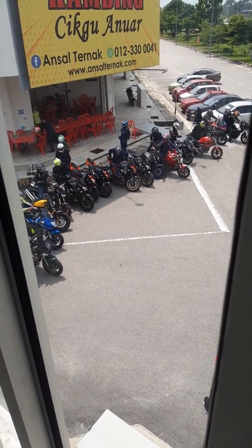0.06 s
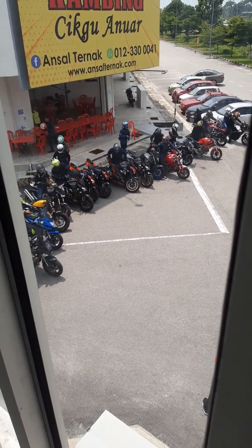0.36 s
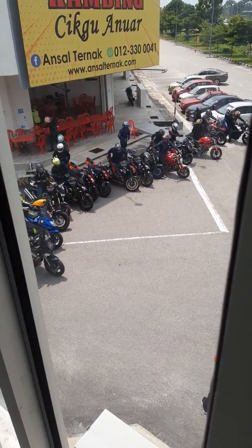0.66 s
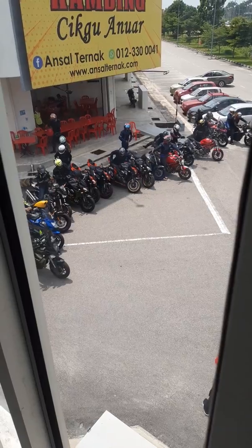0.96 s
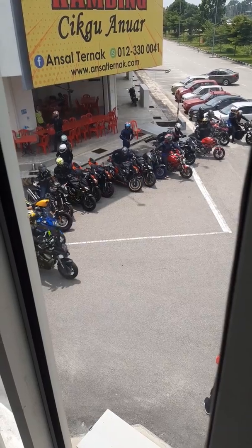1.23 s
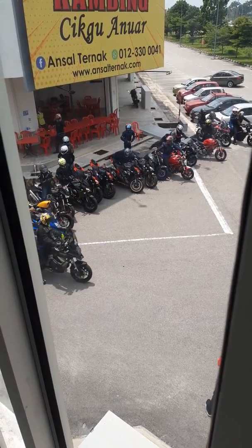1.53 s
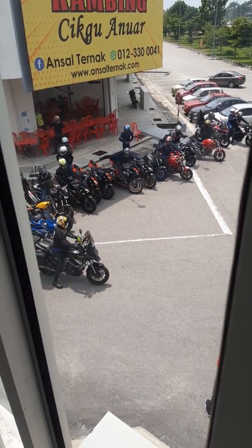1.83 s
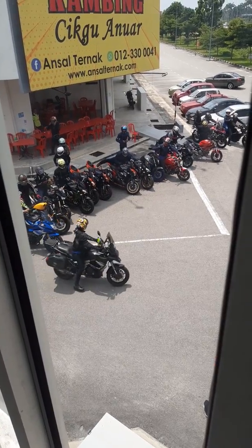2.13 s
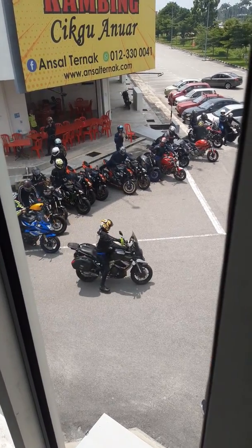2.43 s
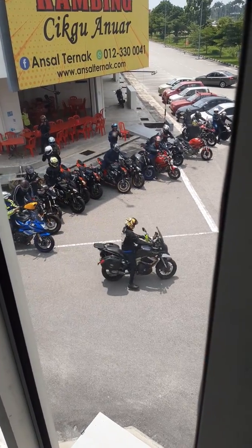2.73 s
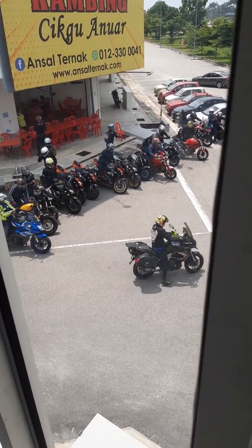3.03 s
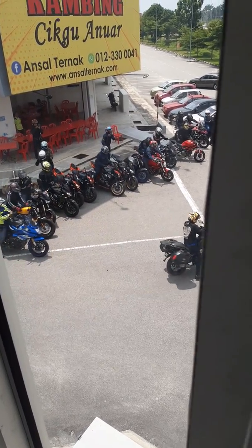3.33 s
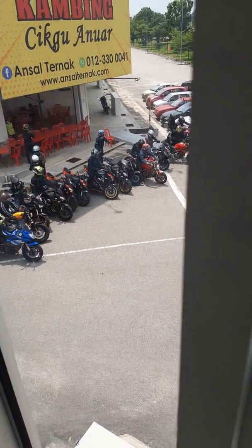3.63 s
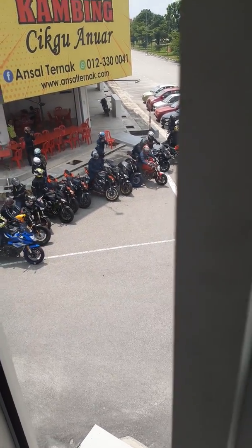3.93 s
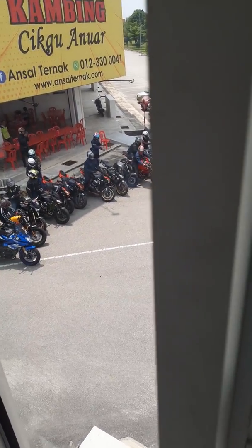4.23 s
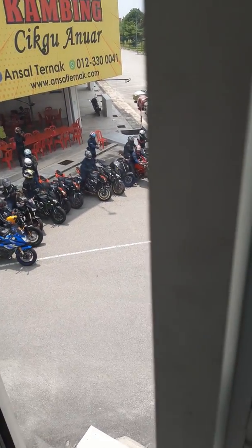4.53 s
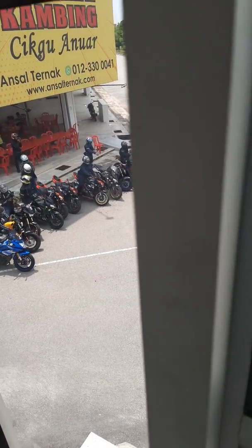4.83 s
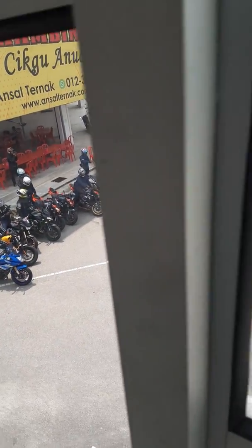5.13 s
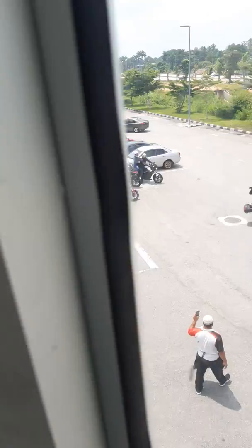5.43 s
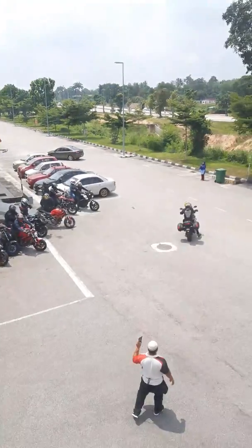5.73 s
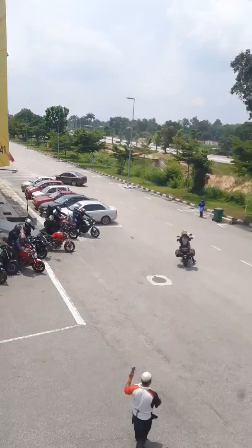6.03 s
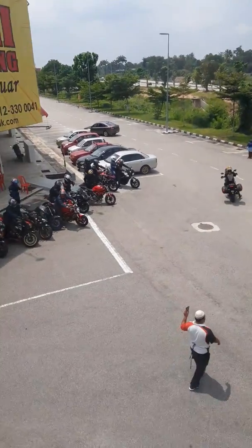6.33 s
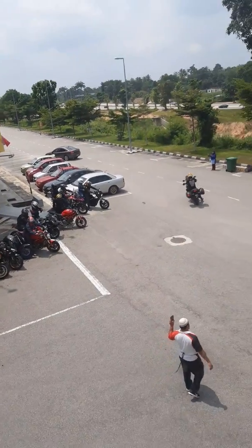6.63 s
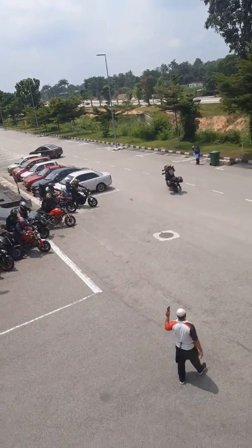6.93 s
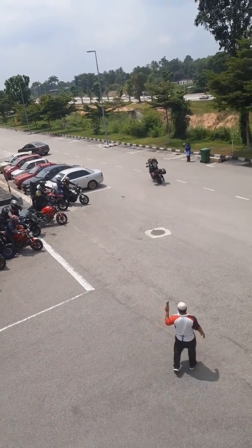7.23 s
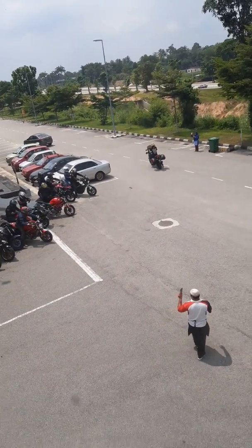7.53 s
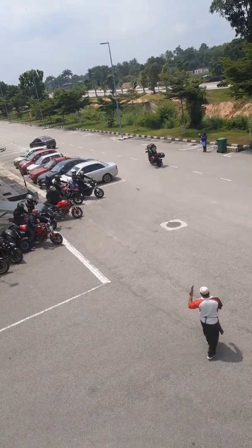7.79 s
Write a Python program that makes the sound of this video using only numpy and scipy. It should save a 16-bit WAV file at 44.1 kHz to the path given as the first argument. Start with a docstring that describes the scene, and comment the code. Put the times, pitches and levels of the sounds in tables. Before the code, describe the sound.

A group of motorbikes throbs and clatters at idle as one accelerates past in short revs, with faint handling noise near the microphone.

```python
"""Twin-cylinder motorcycles idle in a car park, heard through an upstairs window; one rides off.
Uneven firings ring the silencers and beat against each other; valve gear clatters, gears whine
faintly, shop fronts echo. The leaving bike revs, turns its tail to the window and booms past below.
Near the microphone a hand knocks, rubs and clicks; faint squeaks come near the end."""
import sys
import numpy as np
from scipy import signal
from scipy.fft import rfft, irfft, next_fast_len
from scipy.io import wavfile

SR = 44100
rng = np.random.default_rng(int(sys.argv[2]) if len(sys.argv) > 2 else 0)


def generate_wav(sig):
    """Save sig (samples, or channels by samples) to the path in sys.argv[1] as 16-bit PCM at SR."""
    pcm = np.round(np.clip(np.atleast_2d(sig).T, -1, 1) * 32767).astype(np.int16)
    wavfile.write(sys.argv[1], SR, pcm)


N = 346626
TIME = np.arange(N) / SR

# idling twins: cycle_hz, second_firing_cycles, silencer_hz, relative_db
IDLING_TWINS = [(12.43, .375, 94, 2.5), (10.23, .25, 200, -3), (8.7, .44, 210, -5), (11.02, .5, 180, 0),
                (12.0, .45, 195, 3), (9.3, .5, 160, 3)]
# stereo width of the echoes: freq_hz, side_gain_db
SIDE_SPECTRUM = [(30, -20.5), (90, -22), (140, -10.5), (210, -18), (320, -7), (490, -2), (740, -3.5),
                 (1130, 1), (1700, 1), (2600, 0.5), (15000, 1)]


def undb(db):
    """Decibels to gain."""
    return 10 ** (np.asarray(db) / 20)


def unit(x):
    """Scale to rms 1."""
    return x / np.sqrt(np.mean(x ** 2))


def curve(points):
    """Join (time_s, value) points by straight lines."""
    return np.interp(TIME, *np.transpose(points))


def swell(peak_s, rise_s, fall_s):
    """Gaussian rise to 1 and fall."""
    span_s = np.where(TIME < peak_s, rise_s, fall_s)
    return np.exp(-np.minimum(np.abs(TIME - peak_s) / span_s, 10) ** 2)


def held(open_s, attack_s, hold_s, release_s):
    """Gaussian rise to 1, hold and fall."""
    rising = np.minimum(TIME - open_s, 0) / attack_s
    falling = np.maximum(TIME - open_s - hold_s, 0) / release_s
    return np.exp(-rising ** 2 - falling ** 2)


def walk(rate_hz):
    """Random wander, spread near 1."""
    knots = rng.standard_normal(int(N / SR * rate_hz) + 2)
    return np.interp(TIME * rate_hz, np.arange(len(knots)), knots)


def waver(hz, rate_hz):
    """Tone of wandering strength and phase, unrelated in mid and side."""
    phase = 2 * np.pi * np.cumsum(hz) / SR
    return np.array([walk(rate_hz) * np.sin(phase) + walk(rate_hz) * np.cos(phase) for _ in range(2)])


def fade(x, decay_s):
    """Give each pulse an exponential tail."""
    return signal.lfilter([1], [1, -np.exp(-1 / (decay_s * SR))], x)


def colour(x, points):
    """Filter by (freq_hz, gain_db) points."""
    size = next_fast_len(N + SR // 4)
    hz, db = np.transpose(points)
    bins_hz = np.maximum(np.fft.rfftfreq(size, 1 / SR), 1)
    gain = undb(np.interp(np.log(bins_hz), np.log(hz), db))
    return irfft(rfft(x, size) * gain, size)[..., :N]


def band(x, low_hz, high_hz):
    """Steep zero-phase band-pass."""
    size = next_fast_len(N + SR // 4)
    bins_hz = np.maximum(np.fft.rfftfreq(size, 1 / SR), 1)
    gain = 1 / ((1 + (low_hz / bins_hz) ** 10) * (1 + (bins_hz / high_hz) ** 10))
    return irfft(rfft(x, size) * gain, size)[..., :N]


def ring(x, hz, width_hz):
    """Resonance, gain 1 at centre."""
    return signal.lfilter(*signal.iirpeak(hz, hz / width_hz, fs=SR), x)


def steep_ring(x, hz, width_hz):
    """Two like resonances in series."""
    return ring(ring(x, hz, width_hz), hz, width_hz)


def gliding_ring(x, hz, width_hz):
    """Resonance with a moving centre."""
    spin = np.exp(2j * np.pi * np.cumsum(hz) / SR)
    decay_s = 1 / (np.pi * width_hz)
    return 2 * np.real(fade(x / spin, decay_s) * spin) / (decay_s * SR)


def yard(x, wet_db, t60_s=0.74):
    """Direct sound plus echoes off shop fronts and window recess, as mid and side."""
    taps = SR // 2
    tails = rng.standard_normal((2, taps)) * undb(-60 * TIME[:taps] / t60_s)
    tails *= undb(wet_db) / np.sqrt(np.sum(tails ** 2, axis=1, keepdims=True))
    tails[0, 0] += 1  # direct path
    running = np.concatenate([x[taps:0:-1], x])  # engines already running at 0 s
    mid, side = (signal.fftconvolve(running, tail)[taps:taps + N] for tail in tails)
    return np.array([unit(mid), colour(unit(side), SIDE_SPECTRUM)])


def moving_yard(x, wet_db, places=3):
    """A moving source crossfades between sets of echo paths."""
    place = TIME / TIME[-1] * (places - 1)
    return sum(np.sqrt(np.maximum(1 - np.abs(place - k), 0)) * yard(x, wet_db) for k in range(places))


def firings(cycle_hz, second_firing_cycles, hunt_share, scatter_db, second_db=-1.5):
    """Two unevenly spaced firings per four-stroke cycle; speed hunts, no two burns alike."""
    cycles = rng.random() + np.cumsum(cycle_hz * (1 + hunt_share * walk(14))) / SR
    pulses = np.zeros(N)
    for lag, db in ((0, 0), (second_firing_cycles, second_db)):
        count = np.floor(cycles - lag)
        pulses += undb(db) * np.diff(count, prepend=count[0])
    return pulses * undb(scatter_db * walk(200))


def ride(rev_hz=3, turn_s=5.3, turn_span_s=0.33):
    """Leaving bike: cycle rate, throttle (0-1), turn away from the window (0-1)."""
    # engine speed before revs: time_s, cycle_hz
    base_speed = [(0, 10.4), (1.3, 12.27), (1.8, 15.4), (4.5, 11.74), (5.5, 20.1), (7.2, 26.2),
                  (7.86, 29.2)]
    # throttle twists: open_s, attack_s, hold_s, release_s, opening_share
    twists = [(1.599, .4, .35, .3, 0.25), (2.951, .55, .35, .35, .36), (4.859, 0.069, .2, 0.0998, 0.99),
              (6.617, .07, 0.1486, 0.199, .45), (7.048, .1, 0.2, 0.14, 0.36), (7.718, .1, .15, .3, 0.45)]
    throttle = sum(opening * held(*timing) for *timing, opening in twists)
    turned = .5 + .5 * np.tanh((TIME - turn_s) / turn_span_s)
    return curve(base_speed) + rev_hz * throttle, throttle, turned


def idle_pipes(idle_pulses):
    """Each idler's firings ring its silencer."""
    pipes = sum(undb(db) * (1.08 * pulses + ring(pulses, hz, width_hz=60))
                for pulses, (_, _, hz, db) in zip(idle_pulses, IDLING_TWINS))
    return yard(unit(pipes), wet_db=-7.5)


def rider_pipe(pulses, cycle_hz, throttle, turned, reference_hz=28.7):
    """The leaving bike's silencer rings; hotter gas at speed raises its modes."""
    # silencer modes at the reference cycle rate: pitch_hz, width_hz, gain_db
    modes = [(175, 55, 1), (244, 46, -3), (308, 130, -4), (377, 56, -10.5)]
    heat = (cycle_hz / reference_hz) ** 0.21
    ringing = sum(undb(db) * gliding_ring(pulses, hz * heat, width_hz) for hz, width_hz, db in modes)
    relative_db = -16 + 5.5 * throttle + 0.5 * turned
    return undb(relative_db) * moving_yard(unit(0.18 * pulses + ringing), wet_db=3.5)


def hums(weaker_share=0.42, drift_share=0.01205, flutter_db=3.5):
    """Engine orders beat as pairs of like engines drift in and out of step."""
    # engine orders: pitch_hz, start_db, slope_db_per_s, in_step_s, beat_period_s
    orders = [(61.8, -43.5, 1.06, 3.6, 1.4), (72.74, -34.5, 0, 2.72, 3.4), (86.94, -39, 0.66, 2.48, 2.3),
              (93.8, -30.5, -0.85, 1.74, 0.95), (127.03, -31.5, -0.11, 3.09, 1.84),
              (151.9, -30.5, -3.5, 0.59, 2), (187.9, -37, 0, 3.1, 1.25), (206.3, -30, -1.5, 2.427, 1.1)]
    out = np.zeros(N)
    for hz, start_db, db_per_s, in_step_s, period_s in orders:
        cycles = rng.random() + np.cumsum(hz * (1 + drift_share * walk(6))) / SR
        slip = (TIME - in_step_s) / period_s
        pair = np.sin(2 * np.pi * cycles) + weaker_share * np.sin(2 * np.pi * (cycles + slip))
        out += undb(start_db + db_per_s * TIME + flutter_db * walk(11)) * np.sqrt(2) * pair
    return out


def exhausts(pipes, throttle, turned):
    """All pipes and hums rumble; the upper band barks on throttle and as the pipe faces the window."""
    # exhaust spectrum: freq_hz, gain_db
    spectrum = [(22, -41), (32, -34.5), (38, -7.5), (50, -15.5), (60, -6), (90, 3), (112, -5.5),
                (130, -1.5), (160, -.5), (195, -1), (250, -2.5), (310, -10), (365, -15), (420, -29.5),
                (800, -53), (1100, -68)]
    # brief dips of the rumble: centre_s, half_length_s, depth_db
    lulls = [(1.51, .07, -4), (3.8, 0.088, -2), (4.667, 0.093, -1), (5.903, 0.13, -2)]
    pipes = colour(pipes, spectrum)
    pipes *= undb(-23.2) / pipes[0].std()
    pipes[0] += hums()
    bass = band(pipes, 18, 80) * undb(1 - 2 * turned)
    rumble = band(pipes, 80, 265)
    bark = band(pipes, 265, 1500) * undb(-2 + 4 * throttle + 5.5 * turned)
    lull_db = sum(db * swell(centre_s, half_s, half_s) for centre_s, half_s, db in lulls)
    return (bass + rumble) * undb(lull_db) + bark


def firing_tone(pitch_hz=111.9, drift_share=.01):
    """The group's strongest engine order swells and fades."""
    # tone envelope: time_s, relative_db
    envelope = [(0.0, -39), (0.25, -30), (0.6, -35), (0.8, -29), (1.25, -32.5), (1.95, -24.0), (2.5, -40),
                (3.0, -22.5), (3.5, -32.0), (3.7, -25.5), (3.9, -30), (4.05, -41.5), (4.25, -23.5),
                (4.8, -29), (5.2, -23.5), (5.4, -33.5), (5.6, -26.5), (5.95, -33), (6.15, -23.5),
                (6.5, -23.5), (6.9, -36.5), (7.3, -20), (7.6, -30.5), (7.85, -21.5)]
    cycles = rng.random() + np.cumsum(pitch_hz * (1 + drift_share * walk(8))) / SR
    return undb(curve(envelope) + 0.5) * np.sqrt(2) * np.sin(2 * np.pi * cycles)


def clatter(pulses, throttle, turned, settle_s=0.73, hollow_db=-2.5):
    """Each firing sets off a burst of valve and gas noise; the yard smears the gas into a wash."""
    # valve gear and gas spectrum: freq_hz, gain_db
    spectrum = [(250, -2), (400, 5), (510, -0.5), (640, -0.5), (850, -5), (1150, -8.5), (1550, -8.5),
                (2000, -16.5), (2500, -18.5), (3500, -30), (4700, -31.5), (7000, -40), (11000, -37.5),
                (15500, -46.5)]
    power = 0.39 * unit(fade(pulses, 0.0051)) + 2.3 * unit(fade(pulses, 0.061)) + 0.74
    valves, gas = np.sqrt(power) * rng.standard_normal((2, 2, N))
    valves[1] = colour(valves[1], SIDE_SPECTRUM)
    wash = colour(unit(valves) + 0.87 * yard(gas[0], wet_db=8.0), spectrum)
    wash += (undb(hollow_db * turned) - 1) * ring(wash, hz=1000, width_hz=410)  # mids thin after the turn
    level_db = -50.5 + 4.5 * np.exp(-TIME / settle_s) + 0.7 * throttle
    return wash * undb(level_db) / band(wash[0], 567, 2000).std()


def growl(pulses, throttle, turned, leave_s=1.1, speed_m_s=5.6, waiting_m=9):
    """The leaving bike's firings and air gulps ring its cases, valve cover, air box and pipe outlet."""
    # resonances of cases, cover, air box, outlet: pitch_hz, width_hz
    modes = [(810, 210), (1610, 620), (480, 100), (650, 290)]
    gulps = np.sqrt(unit(fade(pulses, 0.014)) + .5) * rng.standard_normal((2, N))
    drive = unit(gulps) + 0.74 * yard(pulses, wet_db=6.0)
    distance_m = np.hypot(waiting_m, speed_m_s * np.maximum(TIME - leave_s, 0))
    away_db = -20 * np.log10(distance_m / waiting_m) - 14.5 * turned  # its body hides the engine
    cases_db = -53.5 - 3.5 * throttle + away_db
    cover_db = -64 + 17.5 * throttle + away_db
    air_box_db = -55.5 + 22 * throttle + away_db
    outlet_db = -64 + 9 * throttle
    out = sum(undb(db) * unit(steep_ring(drive, *mode))
              for db, mode in zip((cases_db, cover_db, air_box_db, outlet_db), modes))
    return out * np.array([[1], [.75]])


def whines(drift_share=.006, flutter_hz=22):
    """Gears and chains sing thin, drifting tones that flutter in the echoes."""
    # gear and chain tones: pitch_hz, level_db, peak_s, half_length_s
    tones = [(477.5, -51.5, 2.5, 1.8), (527, -50, 2.5, 2), (601, -57.5, 1.8, 2), (838, -58.5, .7, 2.6),
             (922, -60, .8, 0.82), (1003, -59.5, 0.47, 0.8), (1630, -61.5, 0.9, 0.99),
             (2230, -70, 1.1, 3.5)]
    out = np.zeros((2, N))
    for hz, db, peak_s, half_s in tones:
        pitch_hz = hz * (1 + drift_share * walk(5))
        out += undb(db) * swell(peak_s, half_s, half_s) * waver(pitch_hz, flutter_hz)
    return out * np.array([[1], [.75]])


def knocks(tail_db=-23, tail_s=0.091):
    """A finger knocks on the microphone case: a noise burst with a short tail rings its modes."""
    # finger knocks: start_s, drive_db, attack_s, contact_s
    contacts = [(0.08, -34, 0.01, 0.013), (0.1305, -31, 0.00088, 0.0054), (.149, -40, .001, .004)]
    # case modes: pitch_hz, width_hz, gain_db
    modes = [(1114, 600, 8.5), (1750, 510, 4.5), (2290, 400, 9.5), (2900, 990, 2.5), (5500, 3600, -10),
             (10800, 2900, -12)]
    push = np.zeros(N)
    for start_s, db, attack_s, contact_s in contacts:
        age_s = np.maximum(TIME - start_s, 0)
        decay = np.exp(-age_s / contact_s) + undb(tail_db) * np.exp(-age_s / tail_s)
        push += undb(db) * (1 - np.exp(-age_s / attack_s)) * decay
    burst = push * rng.standard_normal((2, N))
    return sum(undb(db) * steep_ring(burst, hz, width_hz) for hz, width_hz, db in modes)


def hisses():
    """Thin hisses as the hand shifts."""
    # hiss spectrum: freq_hz, gain_db
    spectrum = [(1000, -16.5), (2500, 5), (3300, -7), (7000, -8.5), (9700, -3), (10600, 4), (12300, 0),
                (13000, 0), (14300, 0), (15500, -7)]
    # hiss swells: peak_s, rise_s, fall_s, level_db, cutoff_hz
    shifts = [(.095, .014, .045, -69, 13500), (3.9, .08, 0.13, -77, 13000), (4.87, .07, 0.098, -67, 14000),
              (5.79, 0.14, .1, -66.5, 17000), (6.63, .03, .07, -74, 14000), (7.08, .12, .15, -77, 14500),
              (7.67, 0.053, 0.062, -64.5, 14270), (7.83, .11, .15, -57, 15000)]
    hiss = unit(colour(rng.standard_normal((2, N)), spectrum))
    out = np.zeros((2, N))
    for *timing, db, cutoff_hz in shifts:
        lowpass = signal.butter(10, cutoff_hz, fs=SR, output="sos")
        out += undb(db) * swell(*timing) * signal.sosfilt(lowpass, hiss)
    return out


def rubs(catch_db=1.5, catch_hz=450):
    """Skin slides in tiny catches, along with duller cloth."""
    # hand strokes: peak_s, rise_s, fall_s, skin_db, cloth_over_skin_db
    strokes = [(.148, 0.051, 0.035, -70, 22), (0.23, 0.049, 0.16, -71, 18.5),
               (1.939, 0.018, 0.019, -68, 14), (3.88, 0.12, 0.76, -71.5, 7.5),
               (4.47, 0.063, 0.32, -75.5, 12), (4.89, 0.093, 0.3, -66.5, 11), (5.45, 0.38, 0.3, -71, 10.5),
               (5.811, 0.14, 0.11, -71, -14), (6.401, 0.94, 0.92, -68.5, -6), (6.63, 0.036, 0.12, -76, 10),
               (7.27, 0.28, 0.45, -73.5, 15.5), (7.819, 0.17, 0.13, -63.5, 7.5)]
    # skin friction: freq_hz, gain_db
    skin_spectrum = [(1500, -13.5), (3500, 0.5), (4900, 7), (7000, -2.5), (9000, 0), (11500, -6.5),
                     (13500, -11.5), (16000, -16)]
    # cloth friction: freq_hz, gain_db
    cloth_spectrum = [(300, -15.5), (600, 0), (1200, 2), (2200, 1), (3500, -9.5), (5000, -18.5),
                      (7000, -25), (12000, -46)]
    grain = rng.standard_normal((2, N)) * undb(catch_db * walk(catch_hz))
    skin = unit(colour(grain, skin_spectrum))
    cloth = unit(colour(rng.standard_normal((2, N)), cloth_spectrum))
    return sum(undb(db) * swell(*timing) * (skin + undb(cloth_db) * cloth)
               for *timing, db, cloth_db in strokes)


def thumps():
    """Dull low thumps in the engines' rumble, where firings happen to coincide."""
    # low thumps: start_s, peak_db
    events = [(.283, -9), (1.626, -14.5), (1.871, -13), (1.975, -11.5), (2.167, -13.5), (2.328, -14),
              (2.487, -15), (2.859, -12.5), (3.016, -19), (3.28, -11.5), (4.313, -17.5), (4.873, -10),
              (5.237, -13.5), (6.444, -22.5), (6.623, -13), (6.953, -12), (7.112, -15.5), (7.255, -15.5),
              (7.449, -8.5), (7.696, -10.5)]
    pulses = np.zeros(N)
    for start_s, db in events:
        pulses[int(start_s * SR)] = undb(db)
    thuds = band(ring(pulses, hz=145, width_hz=190), 65, 290)
    return thuds * pulses.max() / np.abs(thuds).max()


def passing_boom(pulses, level_db=-31.5):
    """The leaving bike's firings build a deep boom as it rolls past below."""
    boom = unit(steep_ring(pulses, hz=60.5, width_hz=16))
    return undb(level_db) * swell(peak_s=5.25, rise_s=3.2, fall_s=0.34) * boom


def clicks():
    """Handling clicks: a snap of noise rings one high resonance."""
    # clicks: start_s, peak_db, pitch_hz, width_hz, decay_s
    snaps = [(4.417, -40, 5730, 550, 0.0017), (6.025, -56, 8800, 2020, .014)]
    out = np.zeros((2, N))
    for start_s, db, hz, width_hz, decay_s in snaps:
        envelope = (TIME >= start_s) * np.exp(-np.abs(TIME - start_s) / decay_s)
        snap = rng.standard_normal((2, N)) * envelope
        click = ring(snap + 1e-18, hz, width_hz) + 0.06 * snap
        out += undb(db) * click / np.abs(click).max()
    return out


def squeaks(rasp_db=2, rasp_hz=160):
    """Faint squeaks catch and slip; pitch arches with strength."""
    # squeaks: peak_s, half_length_s, top_hz, arch_hz, width_hz, level_db
    slips = [(6.968, .032, 13700, 1700, 300, -75), (7, 0.039, 11300, 1200, 700, -76),
             (7.09, 0.077, 11000, 600, 260, -75), (7.09, .06, 14000, 900, 500, -78),
             (7.13, .04, 13500, 500, 350, -79), (7.21, 0.041, 13950, 300, 500, -78),
             (7.171, 0.25, 3960, 39.96, 480, -63.5), (7.311, 0.1, 5730, 150, 800, -67),
             (7.802, 0.11, 3886, 50, 450, -62)]
    out = np.zeros((2, N))
    for peak_s, half_s, top_hz, arch_hz, width_hz, db in slips:
        strength = swell(peak_s, half_s, half_s)
        out += undb(db) * strength * waver(top_hz - arch_hz * (1 - strength), width_hz)
    return out * unit(undb(rasp_db * walk(rasp_hz)))


def scene():
    """Engines and hand, mixed as mid and side, returned as left and right."""
    idle_pulses = [firings(hz, lag, hunt_share=0.00601, scatter_db=1.5) for hz, lag, _, _ in IDLING_TWINS]
    cycle_hz, throttle, turned = ride()
    rider_pulses = firings(cycle_hz, second_firing_cycles=.375, hunt_share=.025, scatter_db=2.0)
    pipes = idle_pipes(idle_pulses) + rider_pipe(rider_pulses, cycle_hz, throttle, turned)
    engines = exhausts(pipes, throttle, turned)
    engines[0] += firing_tone() + thumps() + passing_boom(rider_pulses)
    engines += clatter(sum(idle_pulses) + rider_pulses, throttle, turned)
    engines += growl(rider_pulses, throttle, turned) + whines()
    mid, side = engines + rubs() + hisses() + clicks() + knocks() + squeaks()
    return np.array([mid + side, mid - side])


def record(dry, cutoff_hz=15700):
    """Two microphone ports, slightly unlike in colour; top cut."""
    # port balance: freq_hz, left_minus_right_db
    balance = [(100, 0.83), (500, 1.0), (1400, -1.0), (2600, -3.5),
               (5000, 2.0), (10000, 0.0), (14000, -0.5)]
    ports = [colour(x, [(hz, sign * db / 2) for hz, db in balance]) for x, sign in zip(dry, (1, -1))]
    return signal.sosfilt(signal.ellip(10, .1, 80, cutoff_hz, fs=SR, output="sos"), ports)


dry = scene()
out = record(dry)
generate_wav(out)
```